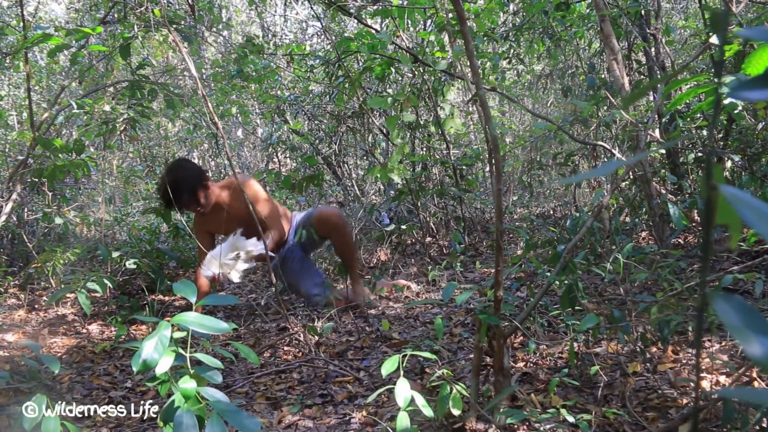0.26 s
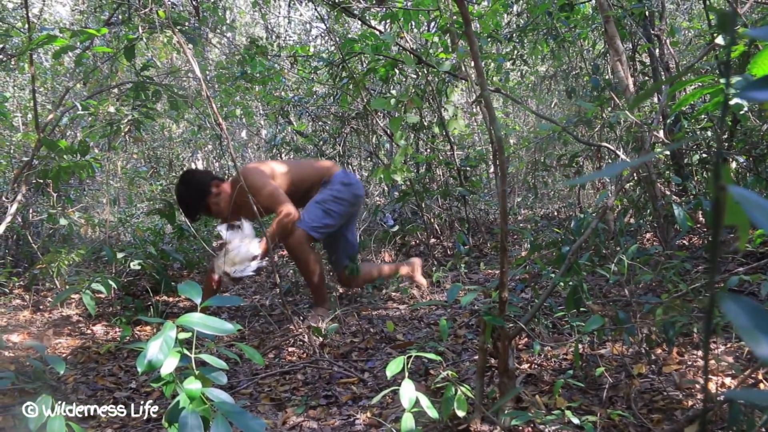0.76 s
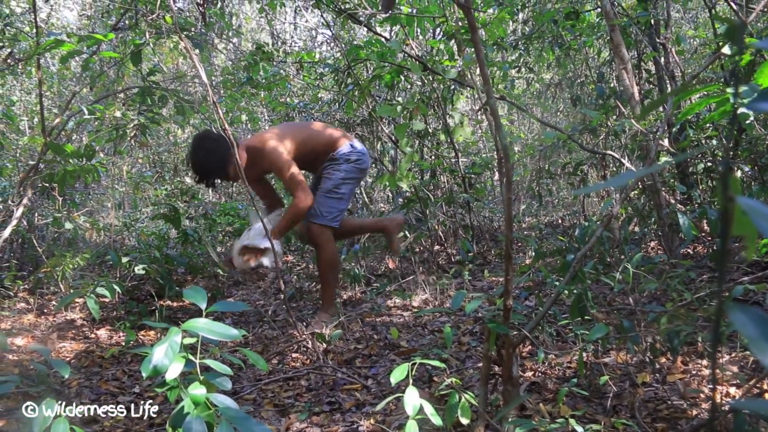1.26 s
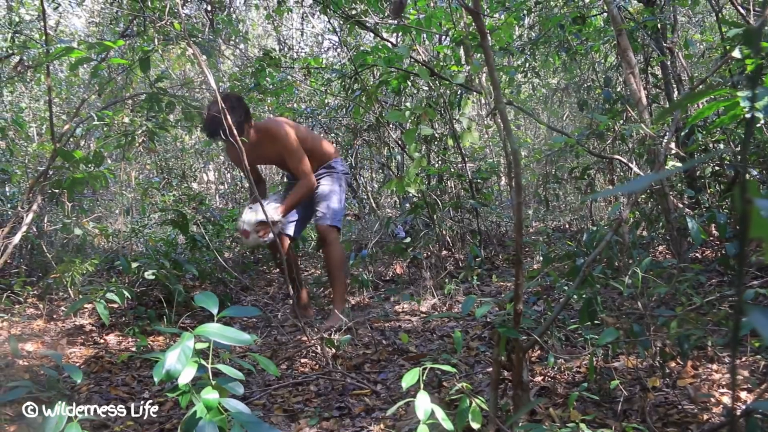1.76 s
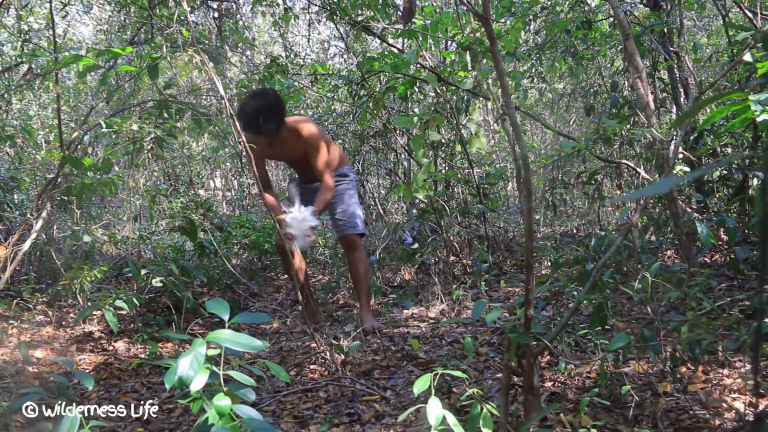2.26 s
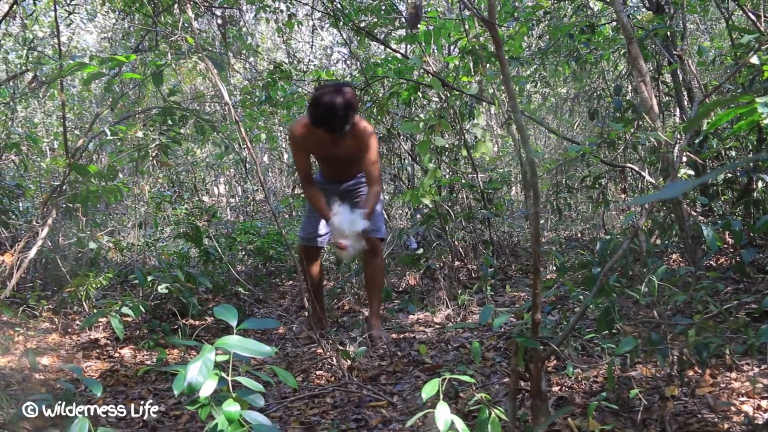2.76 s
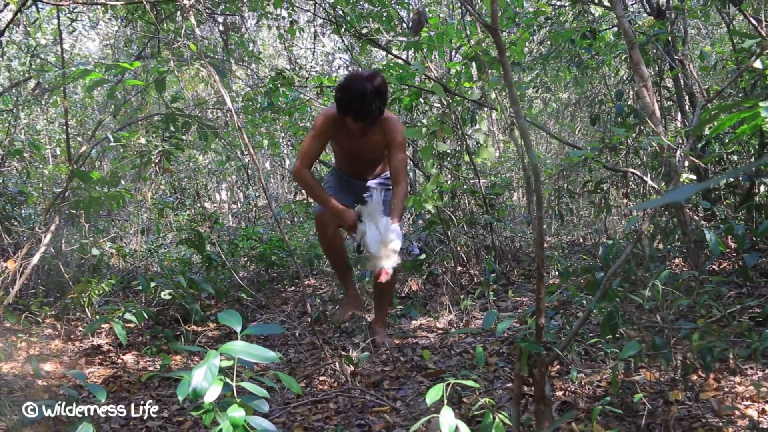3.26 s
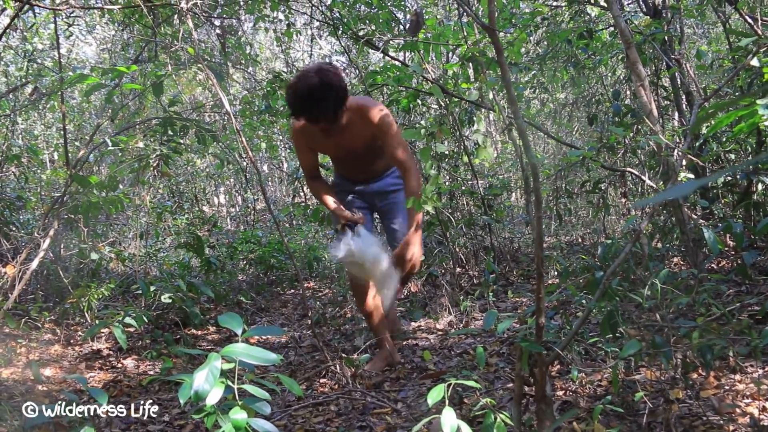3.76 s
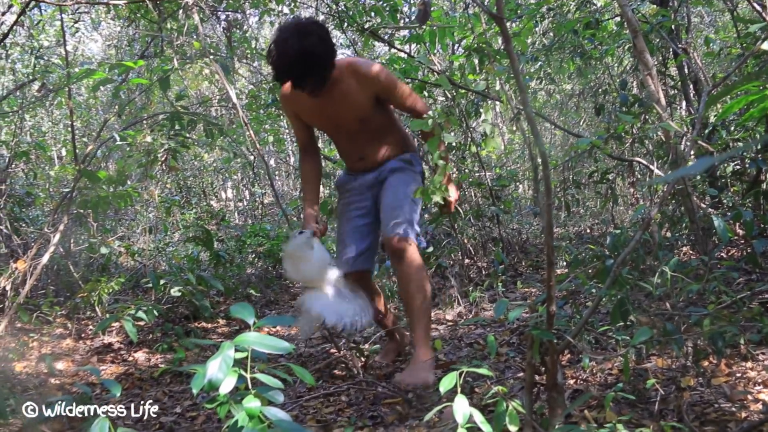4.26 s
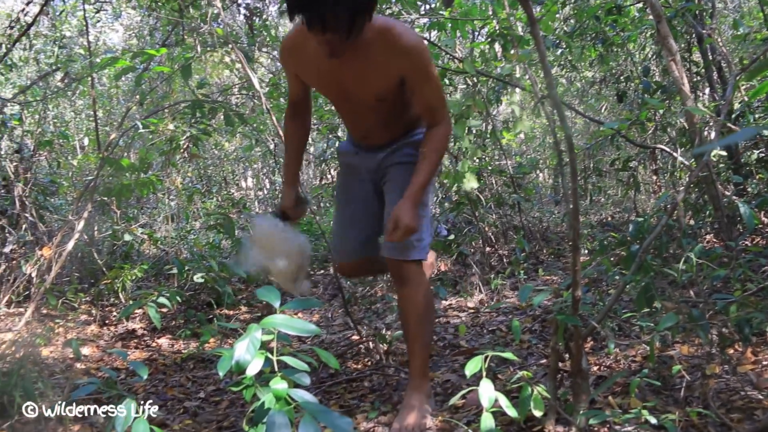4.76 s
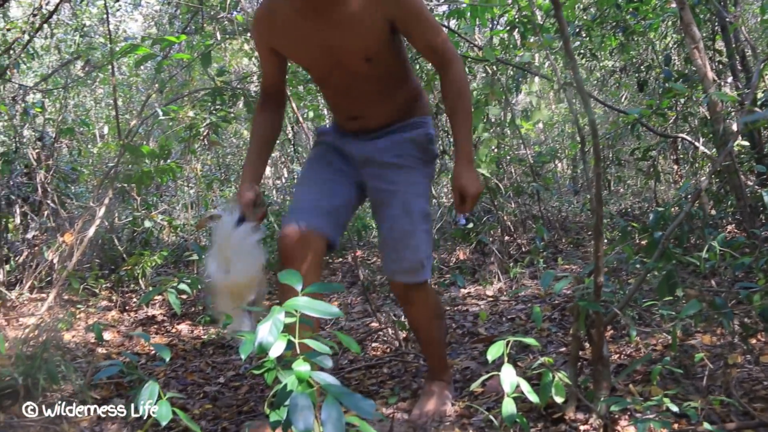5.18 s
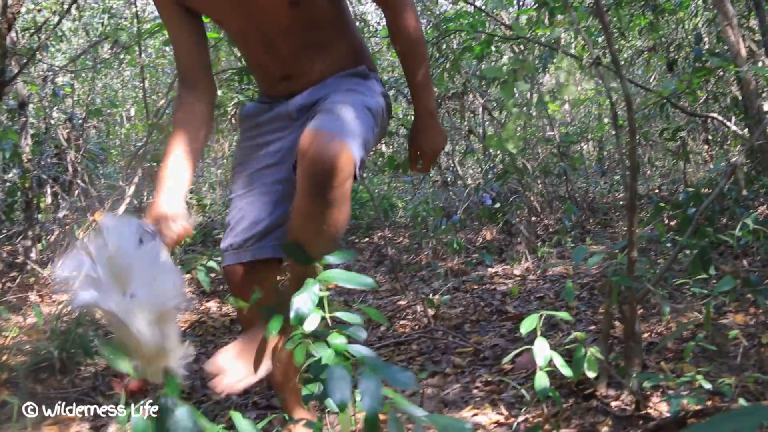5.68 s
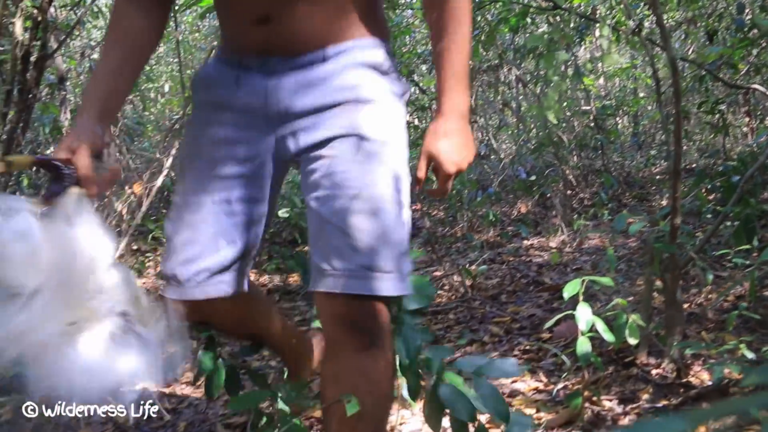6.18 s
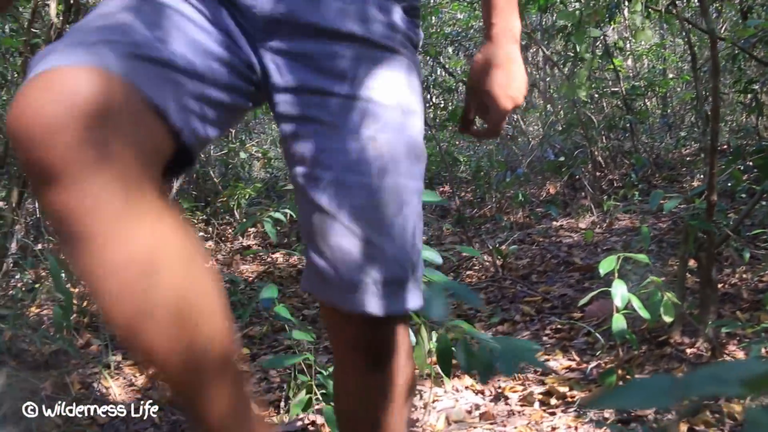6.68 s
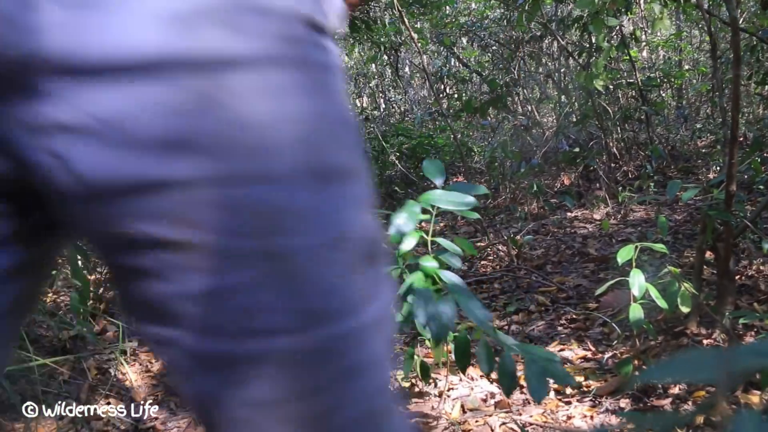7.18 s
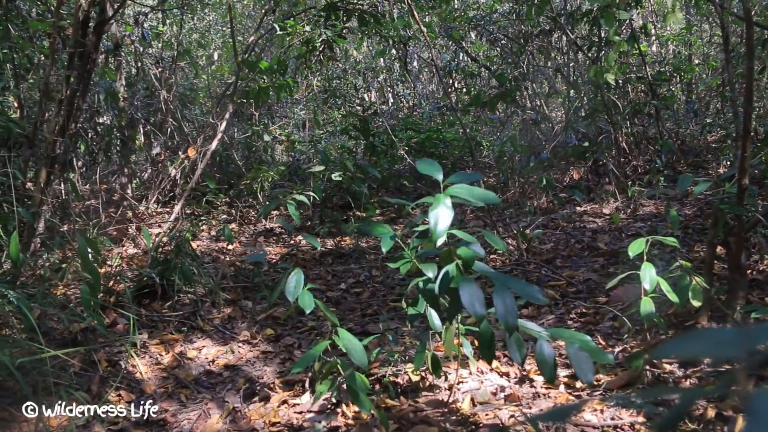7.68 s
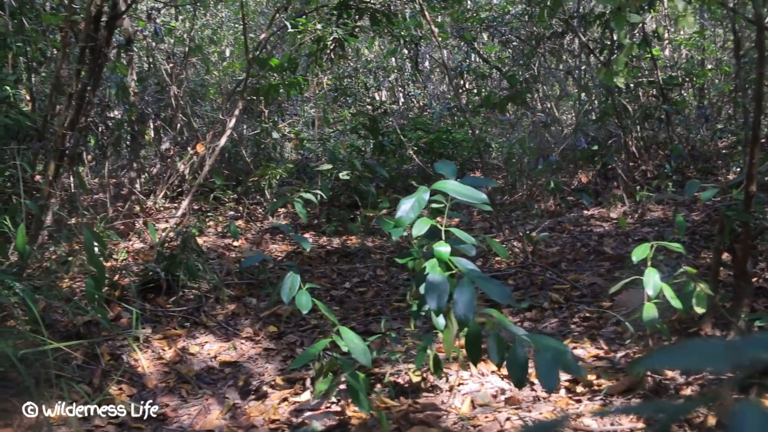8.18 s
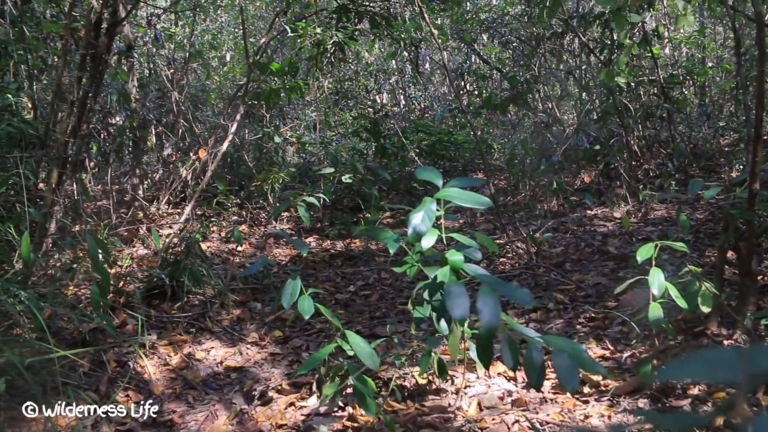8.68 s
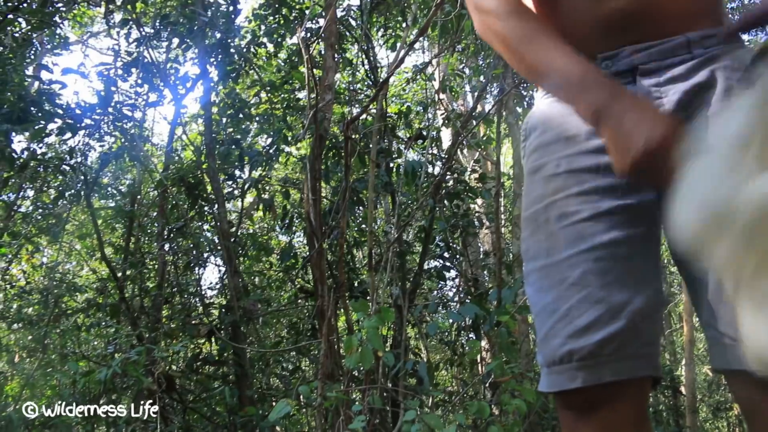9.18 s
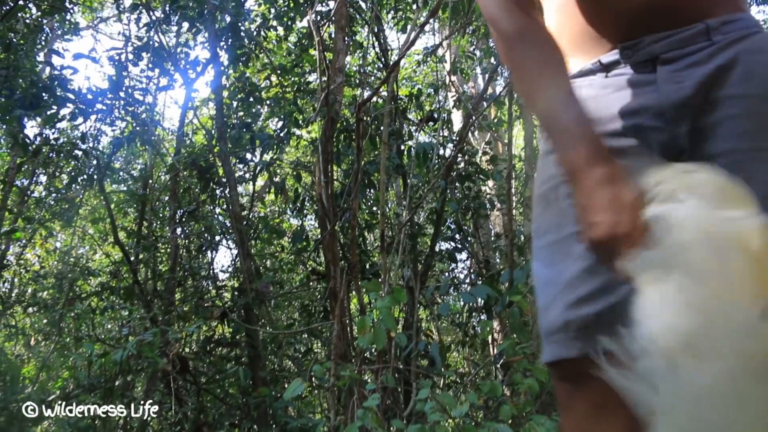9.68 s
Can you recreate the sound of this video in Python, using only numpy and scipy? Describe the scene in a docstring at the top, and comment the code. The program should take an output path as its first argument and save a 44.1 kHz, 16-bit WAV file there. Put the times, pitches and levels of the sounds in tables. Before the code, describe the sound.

Dry leaf litter rustles and crackles under barefoot steps, distant at first, then close to the microphone with soft thumps and sharper twig snaps. Between the steps a held hen makes a few clipped squawks and faint clucks, echoing slightly among the trees. Her last squawk, about two thirds through, is the nearest and loudest. The footsteps continue over a faint, steady forest hiss.

```python
"""From the start, bare feet crush dry leaf litter, snapping twigs, over a faint forest hiss.
From 1.6 s a hen, carried by hand, gives short squawks and soft clucks: her throat, mouth and beak
filter the harmonics of the syrinx, and the trees scatter back a thin echo. Near 4 s the feet come
close and begin to thud on the ground. At 7 s comes the sixth squawk, the nearest and loudest.
The level dips briefly near 8.9 s, and the steps go on to the end."""
import sys
import numpy as np
from scipy import signal
from scipy.fft import rfft, irfft, next_fast_len
from scipy.io import wavfile
from scipy.ndimage import uniform_filter1d, map_coordinates

SR = 44100
rng = np.random.default_rng(int(sys.argv[2]) if len(sys.argv) > 2 else 0)


def unload_audio(sound):
    """Save the sound as a 16-bit wav file, at the path given as the first command line argument."""
    columns = np.transpose(np.atleast_2d(sound))
    # keep every value between -1 and 1, then stretch to whole-number steps
    steps = np.round(np.clip(columns, -1, 1) * 32767)
    wavfile.write(sys.argv[1], SR, steps.astype(np.int16))


N = 438354

# Vocal gestures: (time [s], length [s], lead-in [s], opening pitch [Hz], middle pitch [Hz],
# closing pitch [Hz], level [dB], fade [dB], opening throat resonance [Hz],
# closing throat resonance [Hz], open beak's gain [dB], roughness [0-1])
SQUAWK_GESTURES = [(1.609, 0.014, 0.0025, 380, 353, 352, -29, 2.5, 1380, 1420, -13, 0.2),
                   (1.678, 0.027, 0.013, 439, 368, 337, -29, 5.5, 980, 1570, -32, 0.15),
                   (2.253, 0.03, 0.0063, 383, 420.7, 388.5, -24.5, 3.5, 1080, 1250, -4, 0.52),
                   (3.267, 0.029, 0.0072, 422, 465.5, 459, -29, 2, 1150, 1400, -30, 0.27),
                   (4.577, 0.056, 0.008, 347, 389.3, 350, -24, 3, 1117, 1077, -6, 0.19),
                   (7.01, 0.06, 0.0088, 532, 542, 533, -6, 3.5, 1050, 1297, -30.5, 0.14)]
# The hen's posture in each squawk: (throat sharpness [Q], mouth gain [dB], beak resonance [Hz],
# left over right [dB], left ear's lead [s], echo gain [dB])
SQUAWK_POSTURES = [(11, -20, 2500, -1.5, .00003, -9.5), (8.2, -13, 2100, -.7, 0.000043, -9),
                   (2.9, -11, 2000, -1.5, 0.000038, -6.5), (6.8, -6, 2650, -3.3, 0.000022, -8),
                   (19, -15, 2600, -2.5, 0.000029, -9.5), (5.9, -7.5, 3250, -2, 0.00011, -18)]
# Colour of the voice's overtones: (frequency [Hz], gain [dB])
VOICE_COLOUR = [(350, -4), (550, -1.5), (850, 1), (1400, 2), (1650, 3), (1900, 5), (2600, 2.5), (3400, 4),
                (3750, -10), (4050, -4), (4400, 3), (4900, 8), (6000, -4), (9000, -7), (14000, -26)]
# Closed-beak clucks: (time [s], pitch [Hz], level [dB])
CLUCKS = [(1.591, 487, -48), (1.787, 1030, -41.5), (2.727, 1020, -51), (6.293, 500, -40.5), (7.4, 875, -41),
          (8.636, 1040, -41.5)]
# Steps and shuffles in the litter: (time [s], attack [s], decay [s], relative level [dB],
# crunch offset [dB], scuff offset [dB])
STEPS = [(-0.06, 0.12, 0.1, -42, -0.5, -5), (0.163, 0.042, 0.11, -46, 1.5, -3),
         (0.397, 0.11, 0.089, -40.0, 1, -5.5), (0.573, 0.064, 0.07, -42.0, -4, -7),
         (0.77, 0.21, 0.15, -44.5, -1, -12), (1.192, 0.083, 0.19, -63, 1, -15),
         (1.573, 0.033, 0.049, -41, -3.5, -9), (1.726, 0.11, 0.14, -43.5, -1.5, -7),
         (2.058, 0.026, 0.062, -44, -2.5, -5), (2.36, 0.095, 0.085, -50.5, 1.5, -4.5),
         (2.769, 0.13, 0.048, -54.5, 1.5, -7), (3.038, 0.049, 0.34, -59, 0, -6),
         (3.372, 0.021, 0.056, -52.5, -8, -15), (3.454, 0.18, 0.11, -40, -3, -6),
         (3.52, 0.015, 0.015, -47, -5.0, -8), (3.899, 0.022, 0.052, -54.5, 0, -1),
         (4.014, 0.035, 0.12, -49.5, 0.5, -2.5), (4.101, 0.13, 0.025, -46, -1, -1),
         (4.257, 0.19, 0.078, -41, -3, -7), (4.432, 0.12, 0.11, -48, 3, -1),
         (4.93, 0.031, 0.031, -51.0, 5, -1.0), (5.262, 0.102, 0.028, -40, -4.5, -7.0),
         (5.343, 0.092, 0.054, -40, -3, -10), (5.518, 0.22, 0.23, -51.5, -6, -5),
         (5.992, 0.12, 0.07, -40.0, 1.5, -3.5), (6.181, 0.03, 0.025, -40, -4, -9.0),
         (6.684, 0.11, 0.13, -46.5, -0.5, -1.5), (6.875, 0.087, 0.16, -45, 2.5, 1),
         (7.062, 0.035, 0.071, -30.0, 1.5, -4), (7.185, 0.022, 0.033, -38.5, 3, -5),
         (7.266, 0.011, 0.009, -41.5, 0.0, -1), (7.39, 0.12, 0.013, -48, -0.5, -11),
         (7.487, 0.18, 0.022, -46.5, 4, -0.5), (7.653, 0.15, 0.11, -40.5, -0.5, -6.5),
         (8.048, 0.086, 0.11, -42, -2, -5), (8.172, 0.015, 0.036, -50.5, 2, 14),
         (8.244, 0.05, 0.027, -42.5, -1, -6), (8.37, 0.012, 0.031, -63, -3.5, 10.5),
         (8.426, 0.034, 0.008, -44.5, -2, -3), (8.49, 0.05, 0.046, -52.0, -9, 6.5),
         (8.643, 0.097, 0.036, -46.5, 1.5, 1), (8.765, 0.092, 0.034, -42.0, -1.0, -5),
         (8.907, 0.217, 0.16, -59.5, 5.5, 1), (8.968, 0.014, 0.01, -46, 4.5, -5),
         (9.161, 0.025, 1, -60, 4.5, 2.5), (9.172, 0.02, 0.016, -50, 6, 0.0),
         (9.61, 0.25, 0.55, -56.5, 7.5, 3.5)]
# Faint rustle between steps: (time [s], relative level [dB])
RUSTLE = [(0.0, -55.5), (1.1, -54), (1.5, -58.5), (2.7, -62), (3.9, -62.5), (4.75, -54.5), (5.15, -62.5),
          (6.4, -52.5), (7.4, -56), (8.6, -54), (9.5, -69.5), (9.94, -59)]
# Approach of the feet: (time [s], closeness [0 far to 1 near])
CLOSENESS = [(0, 0.026), (3.6, 0.097), (4.4, 0.79), (5.7, 0.48), (7.2, 0.5), (8.2, 0.77), (9.94, 1)]
# Spectra of breaking leaves and of scuffed litter, far and near: (frequency [Hz], relative level [dB])
LEAF_SPECTRUM = [(880, -21), (1500, -3), (1810, -2), (2100, 9), (2380, 0.5), (2710, 8), (3080, 0.5),
                 (3360, 1.5), (4610, -4), (4990, -4.5), (5400, -6), (11100, -12.5), (15800, -19)]
LEAF_NEAR_SPECTRUM = [(820, -37), (1400, -1.5), (2370, 3), (3250, -3.5), (6150, -8.5), (11300, -6),
                      (15800, -20)]
SCUFF_FAR_SPECTRUM = [(100, -24.5), (280, -25.5), (450, -1), (620, -6), (790, 3.5), (950, 3), (1150, -8.5),
                      (1450, -2), (1700, -8), (2200, -33), (4000, -48)]
SCUFF_NEAR_SPECTRUM = [(30, -23), (80, -13.5), (170, -2), (300, -2.5), (450, -2), (900, 1), (1300, -1),
                       (1800, -10), (4000, -31)]
# Snapping twigs: (time [s], relative level [dB], centre frequency [Hz])
TWIG_SNAPS = [(0.0706, -28.5, 2590), (0.09, -27, 3330), (0.35, -29, 4730), (0.384, -28, 4630),
              (1.5426, -31, 2890), (2.071, -24, 6500), (2.5898, -36, 2830), (3.0844, -32, 1980),
              (3.534, -28, 6000), (3.625, -20, 3530), (4.504, -18.5, 2700), (4.587, -18, 5470),
              (5.4286, -21.5, 5500), (5.477, -24, 7250), (5.65, -29.5, 7000), (5.7299, -26.5, 10300),
              (5.762, -26, 6960), (5.7823, -28, 10940), (5.822, -22.5, 5250), (5.9235, -25, 7300),
              (6.05, -16.5, 5580), (6.7871, -16, 1050), (6.8648, -27, 3280), (7.0944, -14, 6710),
              (7.1497, -19, 2170), (7.2737, -24.5, 4600), (7.468, -24.5, 1900), (7.656, -22.5, 2790),
              (7.7795, -21, 4670), (7.795, -17, 4140), (7.8795, -23.5, 2880), (7.982, -23, 2600),
              (8.044, -26, 4500), (8.107, -23, 4720), (8.153, -29, 1100), (8.6755, -28.5, 2300),
              (9.3882, -36.5, 2420)]
# Impacts on the ground: (time [s], relative knock level [dB], frequency [Hz], relative body level [dB])
GROUND_IMPACTS = [(4.525, -39.5, 810, -42), (4.963, -41, 500, -44), (5.703, -28, 910, -37.5),
                  (6.786, -21.5, 767, -36), (6.808, -38, 1000, -41), (8.011, -26, 262, -56),
                  (8.176, -19, 287, -34), (8.271, -31, 412, -59), (8.378, -31, 434, -45),
                  (8.452, -42, 1010, -56), (8.552, -34.5, 436, -45), (8.714, -32, 625, -54),
                  (8.753, -32.5, 406, -56.5), (9.237, -27.5, 188, -35), (9.864, -36, 259, -33.5)]
# Reverberation among the trees: (frequency [Hz], time to fall 60 dB [s])
REVERB_TIMES = [(200, 0.16), (1400, 0.71), (4000, .5), (12000, 0.44)]
# Canopy air before its low-pass: (frequency [Hz], relative level [dB])
AIR_SPECTRUM = [(15, -51), (25, -20), (70, -0.5), (261, -4), (371, -6), (654, -3.5), (749, -20),
                (1150, -3.5), (1510, -44), (1730, -19.5), (3050, -39), (4690, -18.5), (5370, -28),
                (11400, -25), (15800, -30)]
# Width of diffuse sound: (frequency [Hz], side over mid [dB])
STEREO_WIDTH = [(60, -14), (110, -13.5), (200, -11), (380, -9), (700, -11), (1290, -6), (2380, -5.5),
                (4400, -2), (8120, 0.5), (15000, 0.5)]

SQUAWK_MARGIN_S = 0.001  # room at either end of a squawk for its fades


def hen():
    """Direct and reflected sound: each squawk and cluck is followed by its echo from the trees."""
    out = np.zeros((2, N))
    for row, (q, mouth_db, beak_hz, lean_db, lead_s, echo_db) in zip(SQUAWK_GESTURES, SQUAWK_POSTURES):
        call = squawk(row, q, mouth_db, beak_hz)
        add(out, row[0] - SQUAWK_MARGIN_S, point_source(call, lean_db, lead_s))
        add(out, row[0], amp(echo_db) * tree_echo(call))
    t = np.arange(-SR // 50, SR // 50) / SR
    for time, hz, db in CLUCKS:
        call = cluck(t, hz, db)
        add(out, time + t[0], call * pan(lean_db=-1.2))
        add(out, time + t[0], amp(-7) * tree_echo(call))
    return out


def squawk(row, q, mouth_db, beak_hz, jitter=0.063, flutter=0.65, rasp=0.98, mouth_hz=1640):
    """Source and filter: the syrinx gives harmonics and pulsed air, and the vocal tract shapes both."""
    start, length = row[:2]
    t = np.arange(start - SQUAWK_MARGIN_S, start + length + SQUAWK_MARGIN_S, 1 / SR)
    n = len(t)
    pitch, level_db, throat_hz, beak_db, rough = gesture(row, t)
    phase = 2 * np.pi * np.cumsum(pitch * (1 + jitter * rough * wobble(900, n))) / SR
    harmonic = np.arange(1, 29)[:, None]

    def tract(f, centre_hz, opening_db):
        """Throat, mouth and beak resonances add in power; the last two grow as the beak opens."""
        throat = resonance(f, centre_hz, q) * centre_hz / (1j * f + 30)
        throat /= np.sqrt(1 + (f / (1.2 * centre_hz)) ** 10)
        mouth = amp(mouth_db + opening_db / 2) * resonance(f, mouth_hz, 2.1)
        mouth *= resonance(f, mouth_hz, 0.47)
        beak = amp(opening_db) * resonance(f, beak_hz, 1.1 * q)
        magnitude = np.sqrt(abs(throat) ** 2 + abs(mouth) ** 2 + abs(beak) ** 2)
        return magnitude * np.exp(1j * np.angle(throat)) * amp(along(VOICE_COLOUR, f))

    gains = tract(harmonic * pitch, throat_hz, beak_db)
    # uneven membrane closures shake every harmonic, and the high ones come and go
    gains *= 1 + flutter * rough * np.array([wobble(439, n) for _ in harmonic])
    flicker_db = 4.6 * np.clip(harmonic * pitch / 2000 - .7, 0, 1)
    gains *= amp(flicker_db * np.array([wobble(80, n) for _ in harmonic]))
    gains /= np.linalg.norm(gains, axis=0)
    tone = np.sqrt(2) * np.real(gains * np.exp(1j * harmonic * phase)).sum(0)
    # air rushes through once a cycle, loudest between throat and mouth
    puffs = rng.standard_normal(n) * (1 + np.cos(phase))
    air = filtered(puffs, lambda f: tract(f, throat_hz.mean(), beak_db.mean()) * resonance(f, 1480, 7.1))
    voice = (tone + rasp * rough * unit(air)) / np.sqrt(1 + rough ** 2)
    ramp = np.clip(np.minimum(t - t[0], t[-1] - t) / 0.0019, 0, 1)
    return voice * amp(level_db) * np.sin(np.pi / 2 * ramp) ** 2


def gesture(row, t, turn_share=0.43, release_share=0.224, catch_s=0.0029, settle_s=0.0048):
    """Breath-driven oscillation: it starts rough, catches, settles, then sags as the breath gives out."""
    start, length, lead_in, open_hz, middle_hz, close_hz, db, fade_db = row[:8]
    throat_open_hz, throat_close_hz, beak_db, roughness = row[8:]
    sag_hz_per_s, lead_in_db, release_db, edge_roughness, shut_db = 8300, -9.5, -12, 0.66, -14.5
    age = np.clip(t - start, 0, length)
    progress, held = age / length, 1 - release_share
    dying = np.clip((progress - held) / release_share, 0, 1)
    pitch = np.interp(progress, [0, turn_share, held], [open_hz, middle_hz, close_hz])
    pitch -= sag_hz_per_s * length * release_share * dying
    level_db = db + np.interp(age, [lead_in - catch_s, lead_in, length], [lead_in_db, 0, -fade_db])
    level_db += release_db * dying
    unsettled = np.maximum(np.interp(age, [lead_in, lead_in + settle_s], [1, 0]), dying)
    rough = roughness + (edge_roughness - roughness) * unsettled
    shut = np.interp(progress, [0, 0.71, 1], [1, 0, 1]) ** 2  # the beak opens and closes once
    throat_hz = throat_open_hz + (throat_close_hz - throat_open_hz) * progress
    return pitch, level_db, throat_hz, beak_db + shut_db * shut, rough


def cluck(t, hz, db, width_s=0.0034):
    """A Gaussian tone pulse: with the beak closed, the voice is nearly pure and falls in pitch."""
    phase = 2 * np.pi * hz * (t - 4 * t ** 2)
    envelope = amp(db) * np.exp(-(t / width_s) ** 2)
    return envelope * np.sqrt(2) * (np.sin(phase) + .15 * np.sin(2 * phase))


def leaves(split_hz=4800, crackle_db=5, crunch_db=-0.5, scuff_db=0.5):
    """Fracture noise: leaf edges crackle, leaves crunch, packed litter scuffs; hollow far, full near."""
    t = np.arange(N) / SR
    near = np.interp(t, *np.transpose(CLOSENESS))
    by_distance = lambda distant, close: np.sqrt(1 - near) * distant + np.sqrt(near) * close
    treble_share = lambda hz: 1 / (1 + (split_hz / (hz + 1)) ** 6)
    breaks = fractures(per_s=380, spread_db=2.5, life_s=0.0018, floor=0.37)
    folds = fractures(per_s=220, spread_db=5.0, life_s=0.0019, floor=0.35) * amp(-0.15 * wobble(30, N))
    crackle = grainy(breaks, LEAF_SPECTRUM, lambda hz: np.sqrt(treble_share(hz)))
    crunch = by_distance(*[
        grainy(np.hypot(breaks, folds), spectrum, lambda hz: np.sqrt(1 - treble_share(hz)))
        for spectrum in (LEAF_SPECTRUM, LEAF_NEAR_SPECTRUM)])
    scuff = by_distance(grainy(folds, SCUFF_FAR_SPECTRUM), grainy(folds, SCUFF_NEAR_SPECTRUM))
    layers = zip((crackle, crunch, scuff), (crackle_db, crunch_db, scuff_db), tread(t, near))
    return sum(layer * amp(db) * gain for layer, db, gain in layers)


def tread(t, near):
    """Incoherent sources add in power: each step raises crackle, crunch and scuff, then they settle."""
    rustle_db = np.interp(t, *np.transpose(RUSTLE))
    power = amp([rustle_db, rustle_db + 1.2 + 0.5 * near, rustle_db - 3 + 7 * near]) ** 2
    for start, attack, decay, db, crunch_db, scuff_db in STEPS:
        load = np.clip((t - start) / attack, 0, 1) * np.exp(-np.maximum(t - start - attack, 0) / decay)
        power += np.outer(amp([db, db + crunch_db, db + scuff_db]) ** 2, load ** 2)
    return np.sqrt(power)


def fractures(per_s, spread_db, life_s, floor, tail_s=0.033):
    """A Poisson process: the envelope of tiny breaks, a few large, each with a sharp decay and a fainter,
    slower tail."""
    sizes = amp(spread_db * np.minimum(rng.exponential(size=N), 4))
    impulses = sizes * (rng.random(N) < per_s / SR)
    fade = lambda seconds: signal.lfilter([1 / seconds], [1, -np.exp(-1 / (seconds * SR))], impulses ** 2)
    energy = fade(life_s) + fade(tail_s)
    return unit(np.sqrt(energy / energy.mean() + floor))


def twigs(crack_t60_s=0.026, shake_t60_s=0.13):
    """Brittle fracture: each twig cracks, splinters for a moment and shakes the leaves on it."""
    out, t = np.zeros((2, N)), np.arange(SR // 10) / SR
    tearing = 1 - np.exp(-t / .0008)  # the fibres give way one after another
    decay = amp(-60 * t / crack_t60_s) + .1 * amp(-60 * t / shake_t60_s)
    for start, db, hz in TWIG_SNAPS:
        splinters = amp(2 * wobble(900, len(t)))
        burst = rng.standard_normal((2, len(t))) * decay * splinters * tearing
        crack = diffuse(filtered(burst, lambda f: resonance(f, hz, 0.99) * resonance(f, hz, 0.1)))
        add(out, start, amp(db - 21) * unit(crack))
    return out


def thuds(rise_s=0.0044, body_rise_s=0.0023, body_hz=225, grit_db=-9, gain_db=1.5):
    """Damped impact: feet and sticks on soft ground give a push, a dull puff and a spray of grit."""
    out, t = np.zeros((2, N)), np.arange(SR // 8) / SR
    swell = lambda seconds: (t / seconds) ** 2 * np.exp(2 - 2 * t / seconds)
    grit_band = lambda f: amp(grit_db) * resonance(f, 610, 0.45) ** 2
    for start, db, hz, body_db in GROUND_IMPACTS:
        spray = 0.51 * amp(-60 * t / 0.25)
        noise = rng.standard_normal((2, len(t)))
        grains = noise * (swell(rise_s) + spray * amp(0.79 * wobble(280, len(t))))
        puff = diffuse(filtered(grains, lambda f: resonance(f, hz, 1) * resonance(f, hz, 0.2) + grit_band(f)))
        knock = puff / np.abs(puff).max() + .5 * swell(rise_s) * np.sin(2 * np.pi * hz * t)
        body = amp(body_db) * swell(body_rise_s) * np.sin(2 * np.pi * body_hz * t)
        add(out, start, amp(gain_db) * (amp(db) * knock / np.abs(knock).max() + body))
    return out


def tree_echo(sound):
    """Scattering: trunks and foliage return a diffuse tail that dies at its own rate in each band."""
    hz, t, spectra = signal.stft(rng.standard_normal((2, SR * 2 // 3)), SR, nperseg=256)
    decay = amp(-60 * t / along(REVERB_TIMES, hz)[:, None])
    early = 1 + 6.1 * np.exp(-t / 0.017)  # the ground and near stems answer first
    tail = diffuse(signal.istft(spectra * decay * early, SR, nperseg=256)[1])
    tail = np.pad(tail / np.linalg.norm(tail[0]), ((0, 0), (SR // 250, 0)))  # 4 ms late
    return signal.fftconvolve(sound[None], tail, axes=1)


def forest(cutoff_hz=900):
    """Broadband flow noise: distant air in the canopy rumbles and hisses, drifting slowly in level."""
    air = grainy(1, AIR_SPECTRUM, lambda hz: 1 / np.sqrt(1 + (hz / cutoff_hz) ** 2), patchy_db=-0.9)
    return amp(-60.5 + 0.81 * wobble(3.4, N)) * air


def grainy(envelope, spectrum, band=lambda hz: 1, patchy_db=2.5):
    """Modulated stereo noise of rms 1, in which random patches of frequency stand out for a moment."""
    spectra = signal.stft(rng.standard_normal((2, N)), nperseg=256)[2]
    patches = uniform_filter1d(rng.standard_normal(spectra.shape[1:]), size=3, axis=0)
    patches = uniform_filter1d(patches, size=6, axis=1)
    pair = signal.istft(spectra * amp(patchy_db * unit(patches)), nperseg=256)[1][:, :N]
    return unit(diffuse(filtered(pair * envelope, lambda hz: amp(along(spectrum, hz)) * band(hz))))


def point_source(sound, lean_db, lead_s):
    """Interaural differences: the sound is louder in one ear and a little earlier in the left."""
    shift_s = np.array([[lead_s], [-lead_s]]) / 2
    return pan(lean_db) * filtered(sound, lambda hz: np.exp(2j * np.pi * hz * shift_s))


def diffuse(pair):
    """Coherence falls with frequency: the bass is alike in both ears, the treble unrelated."""
    mid, side = pair[0], filtered(pair[1], lambda hz: amp(along(STEREO_WIDTH, hz)))
    return np.array([mid + side, mid - side]) * pan(lean_db=-1.2)


def pan(lean_db):
    """Left and right gains for an interaural level difference."""
    return amp([[lean_db / 2], [-lean_db / 2]])


def resonance(hz, centre, q):
    """Second-order band-pass resonance with gain 1 at its centre."""
    return 1 / (1 + 1j * q * (hz / centre - centre / (hz + 1e-6)))


def filtered(x, response):
    """Linear filtering: the spectrum is multiplied by a frequency response."""
    n = x.shape[-1]
    padded = next_fast_len(n + SR // 10)
    return irfft(rfft(x, padded) * response(np.fft.rfftfreq(padded, 1 / SR)), padded)[..., :n]


def wobble(rate, size):
    """Smooth random modulation: a spline through rate knots a second."""
    return map_coordinates(rng.standard_normal(int(size * rate / SR) + 4), [np.arange(size) * rate / SR])


def along(points, hz):
    """Interpolation of (frequency [Hz], value) points on a logarithmic axis."""
    frequencies, values = np.transpose(points)
    return np.interp(np.log(hz + 1), np.log(frequencies + 1), values)


def amp(db):
    """Decibels to amplitude ratio."""
    return 10 ** (np.asarray(db) / 20)


def unit(x):
    """Normalisation to rms 1."""
    return x / np.sqrt(np.mean(x ** 2) + 1e-20)


def add(track, start_s, sound):
    """Superposition of a sound on the track."""
    start = max(0, round(start_s * SR))
    part = track[..., start:start + sound.shape[-1]]
    part += sound[..., :part.shape[-1]]


def scene():
    """Superposition: the pressures of the hen, the footsteps and the forest air add."""
    return hen() + leaves() + twigs() + thuds() + forest()


def record(dry, ceiling=0.97, dip_start_s=8.871, dip_end_s=8.922, dip_db=-35, top_hz=15950):
    """Saturation rounds the loudest peaks, the level dips briefly, and a low-pass limits the band."""
    rounded = dry / (1 + (dry / ceiling) ** 12) ** (1 / 12)
    t = np.arange(N) / SR
    dip = uniform_filter1d(1.0 * ((t > dip_start_s) & (t < dip_end_s)), size=100)
    return filtered(rounded * (1 - dip * (1 - amp(dip_db))), lambda hz: hz < top_hz)


dry = scene()
out = record(dry)
unload_audio(out)
```